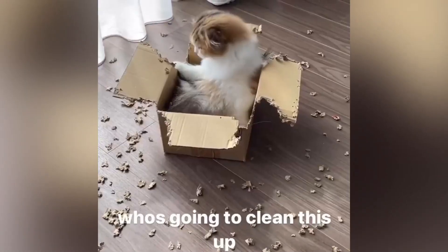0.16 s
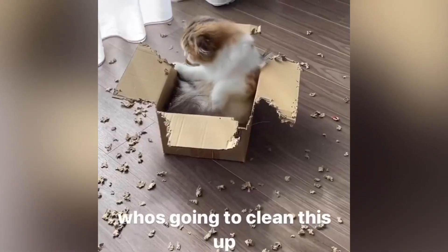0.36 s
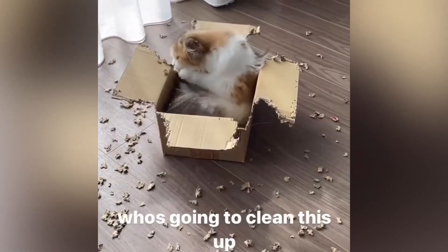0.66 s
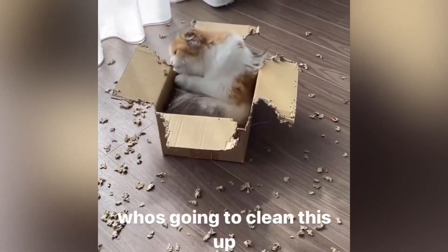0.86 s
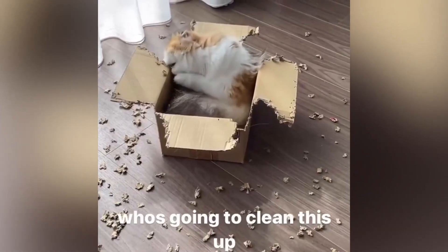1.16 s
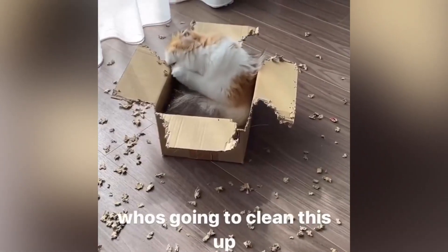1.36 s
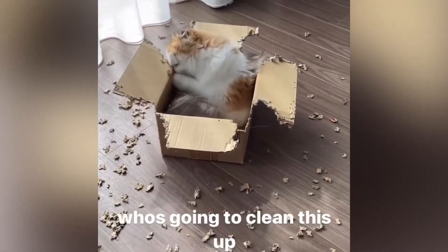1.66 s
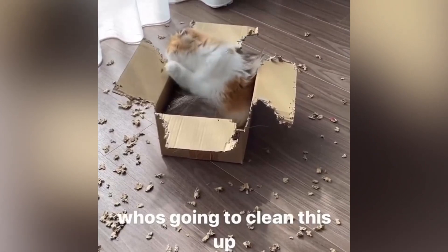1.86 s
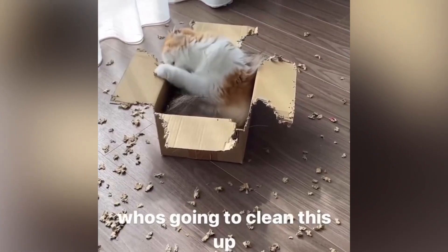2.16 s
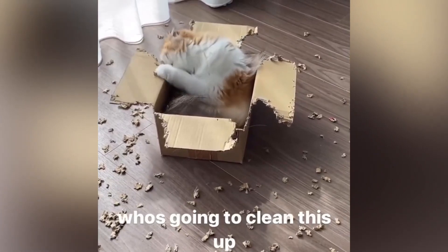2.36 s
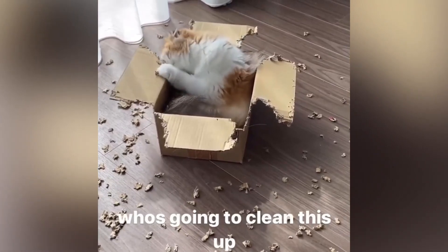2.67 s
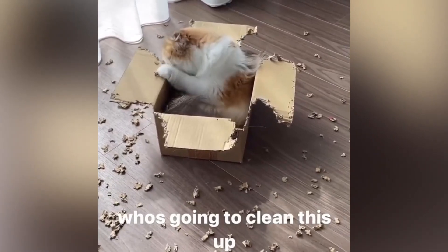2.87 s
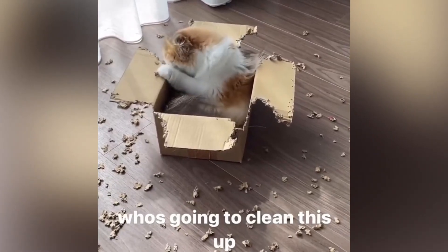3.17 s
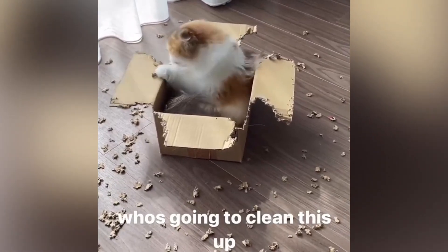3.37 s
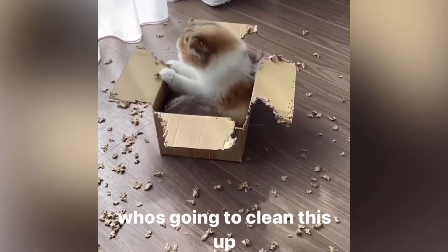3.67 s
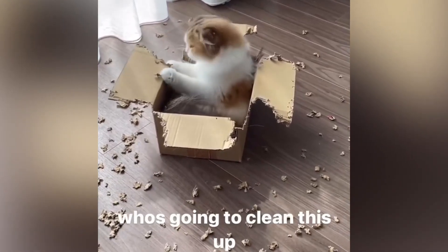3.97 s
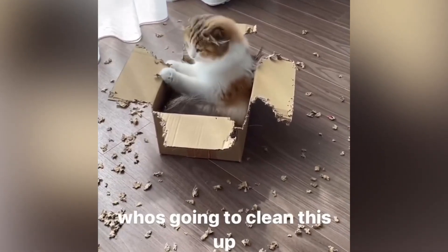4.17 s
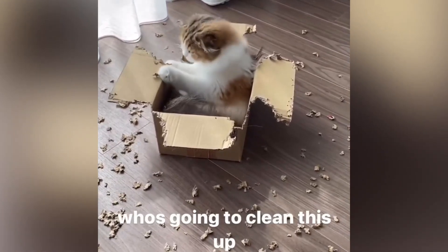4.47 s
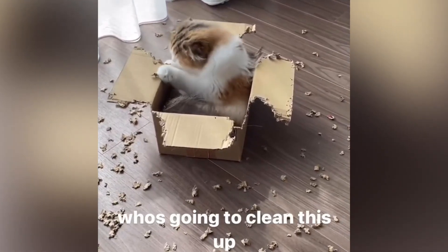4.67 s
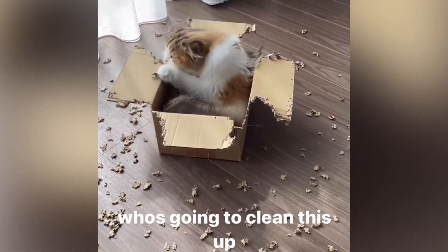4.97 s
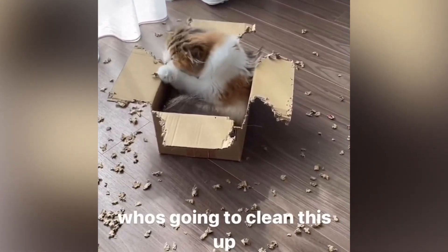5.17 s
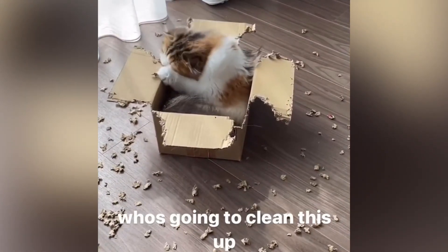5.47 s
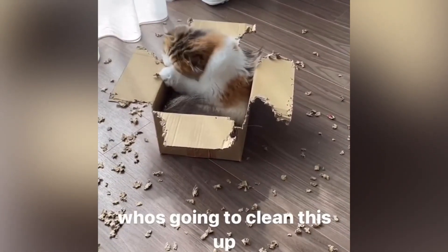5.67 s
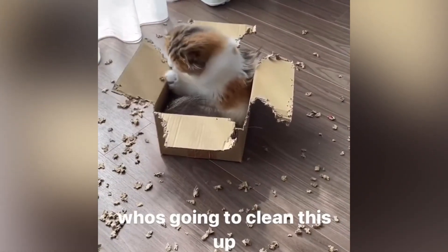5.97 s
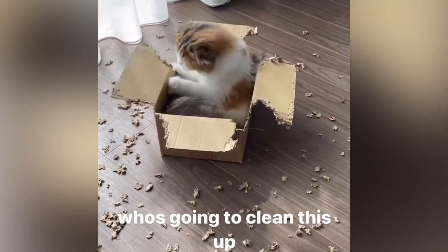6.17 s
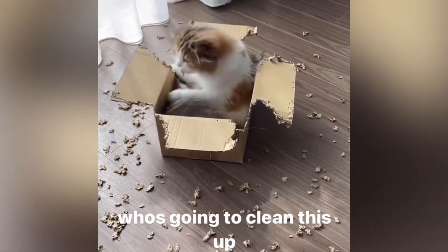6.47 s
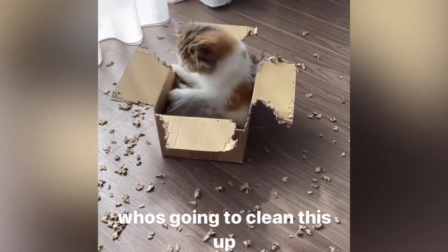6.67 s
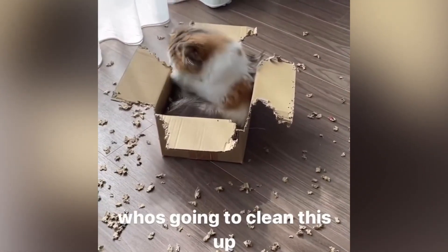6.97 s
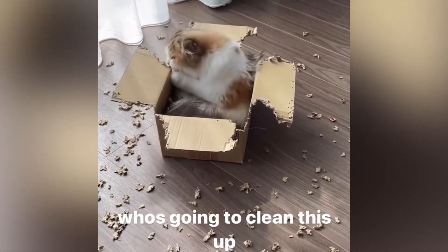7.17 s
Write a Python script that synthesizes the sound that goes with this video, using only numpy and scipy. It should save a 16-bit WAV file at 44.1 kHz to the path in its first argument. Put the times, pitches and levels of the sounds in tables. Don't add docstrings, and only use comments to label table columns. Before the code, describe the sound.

A soft, low ventilation hum with faint motor whine and slowly swelling deep rumble runs throughout in a small, mildly reverberant room. It is alone until about 0.9 s, when a cat in a cardboard box begins faint rubbing. Light hollow taps come at 1.3, 1.6 and 1.9-2.0 s, with dry scuffs and scratches between. From 2.4 to 2.9 s the work gets busier: quick bumps, claw scratches and crisp fibre tearing, strongest around 2.7-2.85 s. At 3.42 s the flap snaps back with the loudest knock, short, woody and hollow, followed by smaller bumps at 3.6, 3.7, 3.9 and 4.0 s. From 4.3 to 5.3 s only very soft rubbing remains. A light tap at 5.45 s and faint scuffs lead to a second hard, boomier double knock at 6.16 s with a slight floor thump. Small rubs fade by 6.6 s, leaving hum until about 7.4 s.

```python
import sys
import numpy as np
from scipy import signal
from scipy.fft import rfft, irfft
from scipy.io import wavfile

SR = 44100
rng = np.random.default_rng(int(sys.argv[2]) if len(sys.argv) > 2 else 0)


def voltage_ratio(level):
    return 10 ** (np.asarray(level, float) / 20)


def materialize(psi):
    bounded = np.clip(np.atleast_2d(psi).T, -1, 1)
    quanta = np.round(bounded * 32767).astype(np.int16)
    wavfile.write(sys.argv[1], SR, quanta)


N = 322812

# f/Hz, level/dB, time to fall by 60 dB/s
BOX_WALLS = [(582, -1, .06), (754, -0.5, 0.053), (844, -3.5, 0.075), (985, -4.5, 0.036), (1264, -7, 0.031),
             (1434, -12, 0.052), (1890, -14, 0.033), (2226, -12.5, 0.035), (2780, -13, 0.023)]


def at_hz(points, hz):
    freqs, levels = np.transpose(points)
    return np.interp(np.log(hz + 1), np.log(freqs), levels)


def over_time(times, levels):
    return np.interp(np.arange(N) / SR, times, levels)


def rms_one(x):
    return x / np.sqrt(np.mean(x ** 2) + 1e-20)


def band(x, lo_hz, hi_hz):
    edges = [lo_hz, min(hi_hz, 0.45 * SR)]
    return signal.sosfilt(signal.butter(3, edges, "band", fs=SR, output="sos"), x)


def resonance(x, hz, width_hz):
    r = np.exp(-np.pi * width_hz / SR)
    feedback = [1, -2 * r * np.cos(2 * np.pi * hz / SR), r * r]
    return signal.lfilter([(1 - r * r) / 2, 0, (r * r - 1) / 2], feedback, x)


def ring(force, modes):
    out = 0
    for k, (hz, level_db, t60) in enumerate(modes):
        r = voltage_ratio(-60 / (t60 * SR))
        w = 2 * np.pi * hz / SR
        strike = [0, voltage_ratio(level_db) * np.sin(w)]
        mode = signal.lfilter(strike, [1, -2 * r * np.cos(w), r * r], force + 1e-18)
        out = out + (-1) ** k * mode
    return out


def grains(per_s, spread_db):
    sizes = voltage_ratio(spread_db * np.minimum(rng.exponential(1, N), 4))
    signs = rng.choice([-1, 1], N)
    return sizes * signs * (rng.random(N) < per_s / SR)


def shaped_noise(spectrum):
    gain = voltage_ratio(at_hz(spectrum, np.fft.rfftfreq(N, 1 / SR)))
    return rms_one(irfft(rfft(rng.standard_normal(N)) * gain, N))


def hum():
    # f/Hz, level/dB per Hz
    hum_shared = [(12, -61), (20, -27.5), (49, -4.5), (70, -1.5), (115, -4), (151, -7.5), (223, -13),
                  (302, -5.5), (357, -12.5), (497, -13.5), (693, -20.5), (796, -21.5), (1210, -38),
                  (8620, -56.5), (15000, -67)]
    # f/Hz, level/dB per Hz
    hum_difference = [(24, -47), (40, -32), (432, -10.5), (466, -11.5), (502, -1), (541, -14.5),
                      (728, -11.5), (784, -6), (845, -13.5), (1260, -30), (15000, -61)]
    # f/Hz, width/Hz, boost/dB
    duct_peaks = [(151.7, 14, 6.5), (312.4, 33, 6), (384, 17, 6)]
    # f/Hz, width/Hz, level/dB
    motor_whines = [(503.5, 2.9, -72), (773.4, 2.5, -71.5)]
    # t/s, level/dB
    rumble_swells = [(0.0, -59), (0.12, -61), (0.2, -62.5), (0.98, -58.5), (1.1, -63), (1.36, -58),
                     (1.49, -73), (1.67, -52), (1.81, -70), (1.96, -60), (2.87, -59.5), (3.0, -48.5),
                     (3.26, -70), (3.48, -44), (3.65, -64), (3.89, -51), (4.44, -60.5), (5.06, -55),
                     (5.36, -59.5), (6.06, -59.5), (6.22, -50), (6.42, -65), (6.85, -48.5), (7.14, -68),
                     (7.32, -54)]

    hum_db, side_db = -54, -63.5
    mid, side = shaped_noise(hum_shared), shaped_noise(hum_difference)
    for centre_hz, width_hz, boost_db in duct_peaks:
        mid = mid + (voltage_ratio(boost_db) - 1) * resonance(mid, centre_hz, width_hz)
    mid, side = voltage_ratio(hum_db - 3.5) * mid, voltage_ratio(side_db) * side

    for tone_hz, width_hz, level_db in motor_whines:
        mid = mid + voltage_ratio(level_db) * rms_one(resonance(rng.standard_normal(N), tone_hz, width_hz))
        side = side + voltage_ratio(level_db - 2) * rms_one(resonance(rng.standard_normal(N), tone_hz, width_hz))

    swell_s, swell_db = np.transpose(rumble_swells)
    rumble = rms_one(resonance(resonance(rng.standard_normal(N), 58.8, 14), 58, 35))
    mid = mid + voltage_ratio(over_time(swell_s, swell_db) - 1.5) * rumble
    return np.array([mid + side, mid - side])


def rubbing():
    # t/s, wall rub level/dB, paw scuff level/dB, claw scratch level/dB, tearing level/dB
    cat_work = [
        [(0.9, -87, -98, -99, -102), (0.93, -87, -81, -97, -105), (1.02, -89, -92, -100, -108),
         (1.08, -93, -83, -83, -90), (1.19, -74.5, -81.5, -93, -93), (1.34, -65, -75.5, -88, -99),
         (1.37, -75, -71, -83, -87), (1.52, -89, -98, -103, -96), (1.57, -74, -69, -71.5, -73),
         (1.63, -56, -62, -73, -79), (1.68, -80, -91, -91, -102), (1.83, -91, -94, -103, -116),
         (1.87, -99, -88, -98, -101), (1.92, -68, -77.5, -79, -81), (2.03, -66, -71, -75, -78),
         (2.13, -69, -79, -82.5, -83), (2.26, -71.5, -70, -73.5, -79), (2.41, -69.5, -82, -85, -96),
         (2.43, -66, -68, -81, -94), (2.5, -68, -87, -99, -109), (2.55, -78, -84, -96, -98),
         (2.58, -57, -62.5, -70, -76), (2.62, -71, -74.5, -79, -78), (2.71, -53.5, -60, -65, -70),
         (2.71, -47, -44.5, -58.5, -55), (2.74, -77, -86, -68, -68), (2.8, -73, -78, -73.5, -73),
         (2.83, -51, -51.5, -60, -62), (2.85, -62, -70, -62, -68), (2.91, -72, -65, -70, -70),
         (2.99, -71, -90, -92, -103), (3.14, -81, -80, -81, -87), (3.18, -78, -101, -98, -102),
         (3.32, -79, -99, -104, -109), (3.35, -80, -85, -100, -91)],
        [(3.36, -73, -93, -99, -96), (3.394, -80, -71, -95, -99), (3.424, -30, -39, -43.5, -55),
         (3.434, -55, -62, -61, -64), (3.572, -73, -79, -85, -89), (3.642, -72, -66, -69, -73),
         (3.702, -73, -81, -78, -86), (3.726, -53, -60, -64, -67), (3.844, -80, -100, -103, -102),
         (3.936, -53.5, -63, -75.5, -82), (3.994, -73, -101, -97, -103), (4.018, -68, -58.5, -72, -81),
         (4.072, -65, -87, -94, -102), (4.206, -77, -95, -105, -116), (4.25, -88, -90, -98, -116)],
        [(4.3, -73, -100, -99, -103), (4.35, -71, -101, -104, -115), (4.468, -69, -74.5, -98, -103),
         (4.536, -84, -97, -103, -101), (4.542, -75, -102, -105, -115), (4.628, -78, -73, -96, -101),
         (4.65, -68, -85, -101, -115), (4.692, -86, -94, -99, -100), (4.726, -76, -89, -105, -108),
         (4.896, -86, -99, -99, -106), (4.934, -69, -93, -102, -116), (4.95, -78, -102, -95, -101),
         (4.974, -86, -94, -103, -101), (5.032, -66, -81, -91, -101), (5.218, -90, -100, -105, -116),
         (5.254, -82, -100, -95, -99), (5.3, -90, -92, -94, -100)],
        [(5.35, -78, -93, -99, -101), (5.44, -71, -77, -94, -101), (5.456, -61, -64.5, -75, -84),
         (5.614, -73, -90, -92, -102), (5.642, -66.5, -76, -80, -97), (5.726, -75, -82, -94, -99),
         (5.742, -93, -88, -99, -114), (5.826, -66.5, -63.5, -77.5, -99), (5.914, -60.5, -70, -86, -101),
         (5.966, -75, -86, -90, -100), (6.122, -68, -69, -79, -79), (6.15, -73, -91, -88, -102),
         (6.16, -56, -39, -51, -65), (6.174, -30, -44, -63, -57), (6.226, -64, -60, -64, -83),
         (6.268, -60, -64, -67.5, -83), (6.316, -70, -59, -65, -80), (6.366, -73, -76, -101, -103),
         (6.55, -77, -85, -102, -113), (6.6, -75, -95, -101, -101)],
    ]

    times, *levels = np.transpose(np.concatenate(cat_work))
    wall, scuff, scratch, tear = (voltage_ratio(over_time(times, level) - 1) for level in levels)
    damped = [(hz, level_db, 0.28 * t60) for hz, level_db, t60 in BOX_WALLS]
    out = wall * rms_one(band(ring(grains(900, 3.7), damped), 500, 1600))
    out += scuff * rms_one(band(ring(grains(2500, 3.4), damped[-4:]), 1637, 3300))
    out += scratch * rms_one(band(grains(6000, 2.3), 2160, 6500))
    out += tear * rms_one(band(grains(7600, 3.8), 7800, 15600))
    return out


def knocks():
    # t/s, peak level/dB, then boom, floor thump and crack relative to it/dB, contact/ms
    knock_list = [(1.074, -64, -8, -9, -7, 4.0), (1.298, -48, -4.5, -10, -33, 3.7),
                  (1.374, -53.5, -9, -7, -13, 4.2), (1.621, -39.5, -1.5, -14, -26, 4.4),
                  (1.704, -56, 3, -2, -25, 4.0), (1.917, -51, -3.5, -13, -16, 4.5),
                  (1.939, -59, 2.5, -8, -8, 4.0), (1.986, -50, 5, -10, -22, 3),
                  (1.997, -47.5, -8, -7, -32, 4.0), (2.428, -43.5, 0.5, -17, -35, 3.3),
                  (2.579, -53, -9, -11, -19, 3.5), (2.66, -52.5, 0, -8, -9, 3.3),
                  (2.716, -38.5, -1, -23, -11.5, 2.8), (2.827, -36.5, -5, -27, -16, 3.8),
                  (2.839, -55, 6, -13, -17, 4.0), (2.881, -45, 1.5, -12, -11, 4.2),
                  (2.894, -53, -1.5, -7, -7, 3.7), (3.412, -31, -12, -28, -29, 5.5),
                  (3.422, -22, -8, -32, -21, 2.2), (3.449, -37.5, -14, -16, -24, 4.7),
                  (3.623, -45.5, -9, -10, -16.5, 5.3), (3.723, -43, -8.5, -4, -15, 2.8),
                  (3.922, -50.5, -4, 6, -18, 2.7), (4.019, -43.5, -12, -8.5, -23.5, 5.8),
                  (5.455, -43, -12.5, -22, -30, 3.4), (5.808, -56, 1, -10, -23.5, 5.1),
                  (5.906, -48, -12, -12, -23.5, 3.6), (6.003, -50.5, -4, -2, -25, 4.0),
                  (6.14, -44.5, -6, -27, -29, 4.7), (6.159, -28, -4, -14.5, -13.5, 3.2),
                  (6.175, -24, -8, -11, -26, 4.0), (6.198, -38.5, -7, -3, -22, 4.4),
                  (6.434, -56, -12, -4, -20, 4.7)]
    # f/Hz, level/dB, time to fall by 60 dB/s
    box_boom = [(150.4, 1.5, 0.17), (224.5, 6, 0.082), (301, 1.5, 0.043), (364.4, 0, .08), (444, 3, 0.048)]

    walls, boom, thump, crack = np.zeros((4, N))
    t = np.arange(int(0.04 * SR)) / SR
    for start_s, peak_db, boom_db, thump_db, crack_db, contact_ms in knock_list:
        noise = rng.standard_normal((3, len(t)))
        start = round(start_s * SR)
        at = slice(start, start + len(t))
        fade = np.exp(-t * 1000 / np.clip(contact_ms, 0.3, 12))
        force = noise * fade / np.sqrt(np.sum(fade ** 2))
        walls[at] += voltage_ratio(peak_db - 8.5) * force[0]
        boom[at] += voltage_ratio(peak_db + boom_db - 2.5) * force[1]
        thump[start + 220] += voltage_ratio(peak_db + thump_db - 3)
        crack[at] += voltage_ratio(peak_db + crack_db + 8.5) * noise[2] * fade

    floor = ring(thump, [(63.2, 0, 0.29)])
    out = ring(walls, BOX_WALLS) + ring(boom, box_boom)
    return out + band(floor, 36, 110) + band(crack, 1950, 6260)


def room(x):
    t60_s, high_t60_s, room_db = 0.37, 0.38, -3
    t = np.arange(int(0.6 * SR)) / SR
    noise = rng.standard_normal((3, len(t))) * np.clip(t / 0.0024, 0, 1)
    low = band(noise[0], 34, 333) * voltage_ratio(-60 * t / t60_s)
    middle = band(noise[1:], 338, 2500) * voltage_ratio(-60 * t / t60_s)
    high = band(noise[1:], 2640, 19000) * voltage_ratio(-60 * t / high_t60_s)
    tail = (low + middle + high) / np.sqrt(SR * t60_s / np.log(1e6))
    return voltage_ratio(room_db) * signal.fftconvolve(x[None], tail, axes=1)[:, :N]


def scene():
    port_lag_ms = 0.17
    peak_hz, peak_width_hz, peak_db = 1150, 880, 5.6
    air = hum()
    box = rubbing() + knocks()
    late = np.interp(np.arange(N) - port_lag_ms * SR / 1000, np.arange(N), box)
    near = np.array([box, late]) + room(box)
    near[0] += (voltage_ratio(peak_db) - 1) * resonance(near[0], peak_hz, peak_width_hz)
    return near + air * voltage_ratio(np.array([[0.5], [-0.5]]))


def band_limit(x):
    return signal.sosfilt(signal.butter(12, 15680, fs=SR, output="sos"), x)


def record(dry):
    return band_limit(dry)


dry = scene()
out = record(dry)
materialize(out)
```